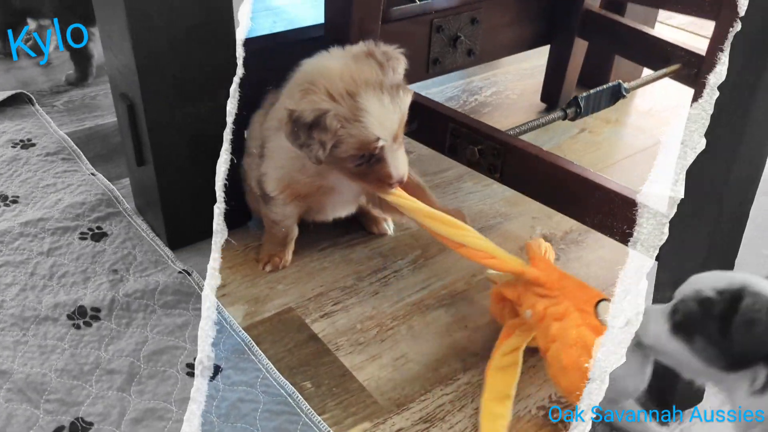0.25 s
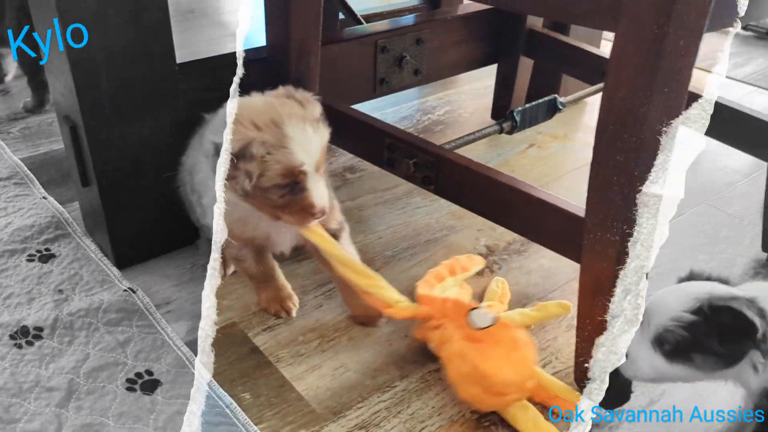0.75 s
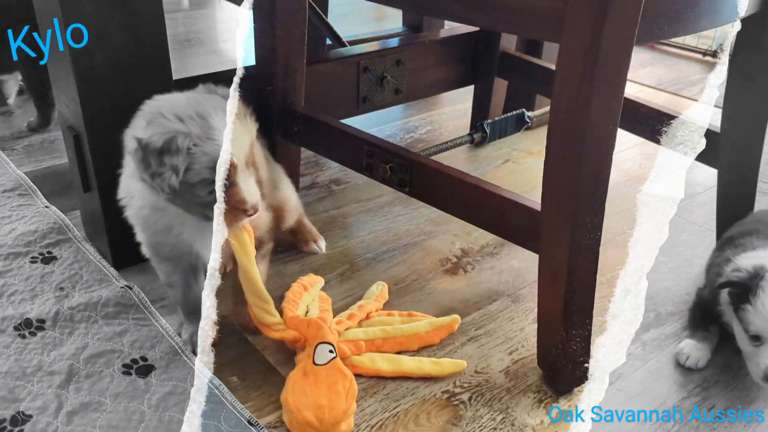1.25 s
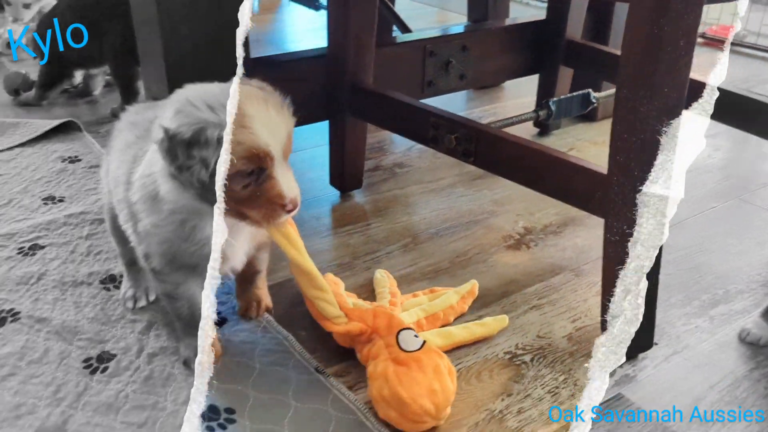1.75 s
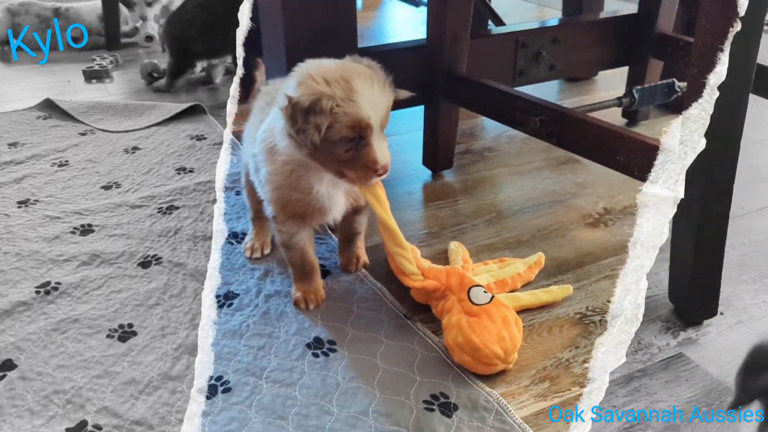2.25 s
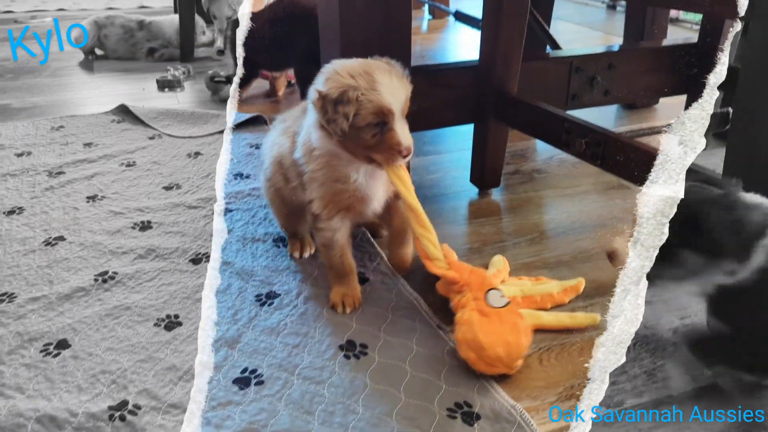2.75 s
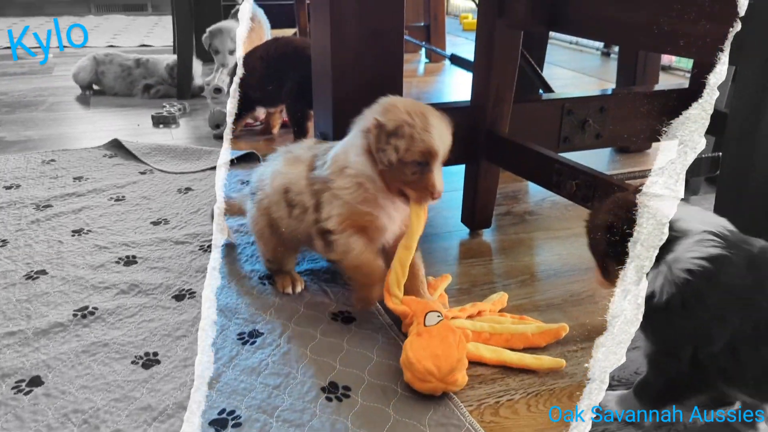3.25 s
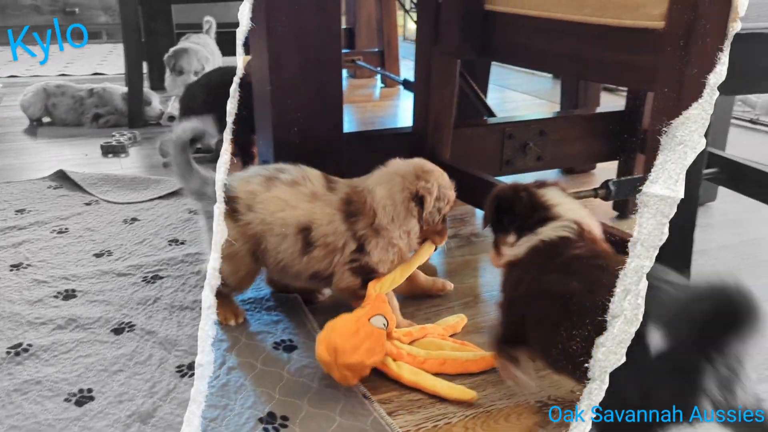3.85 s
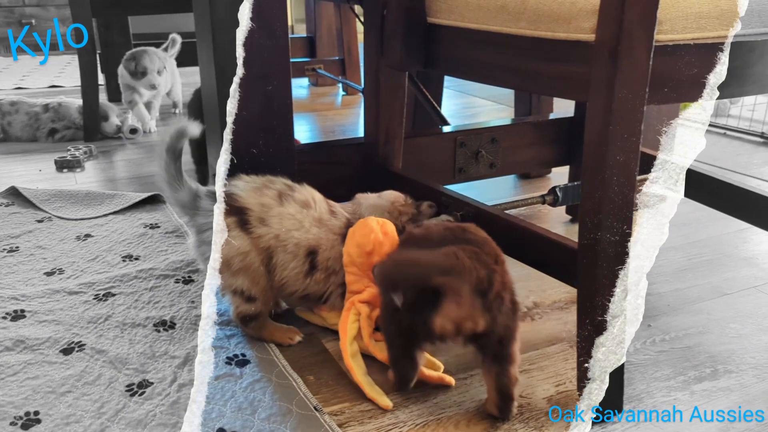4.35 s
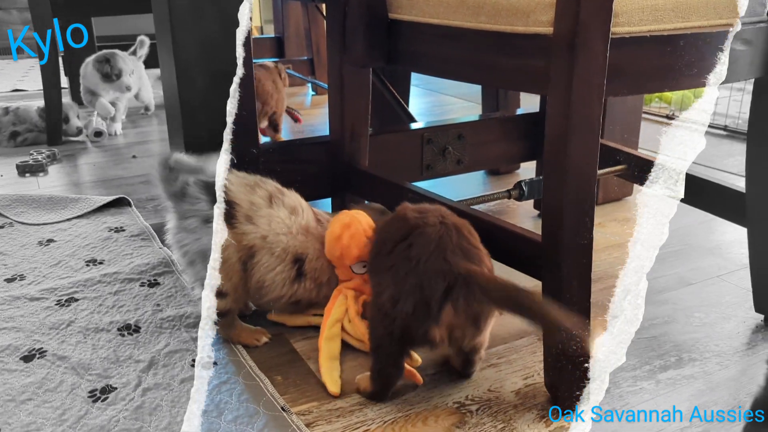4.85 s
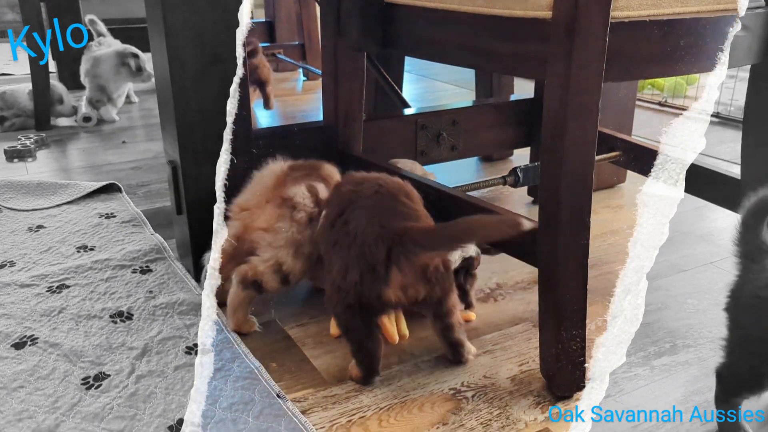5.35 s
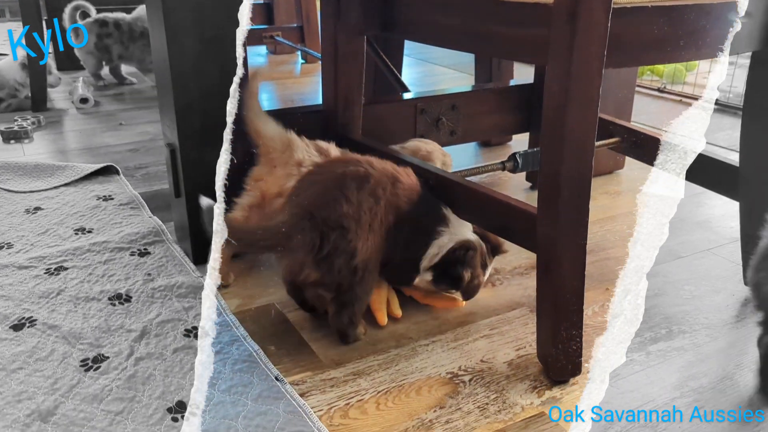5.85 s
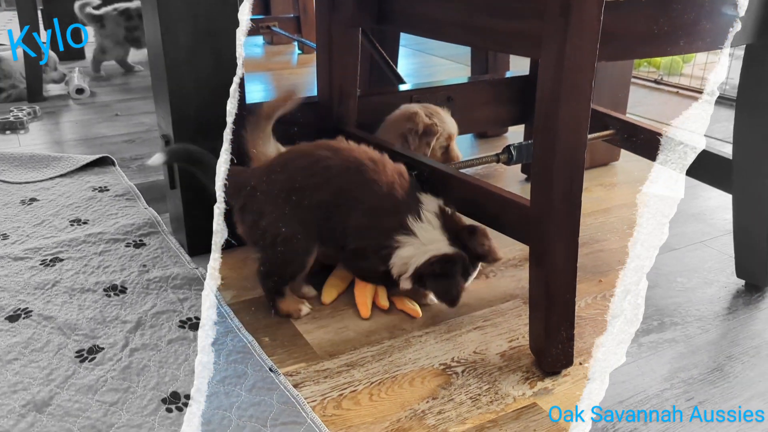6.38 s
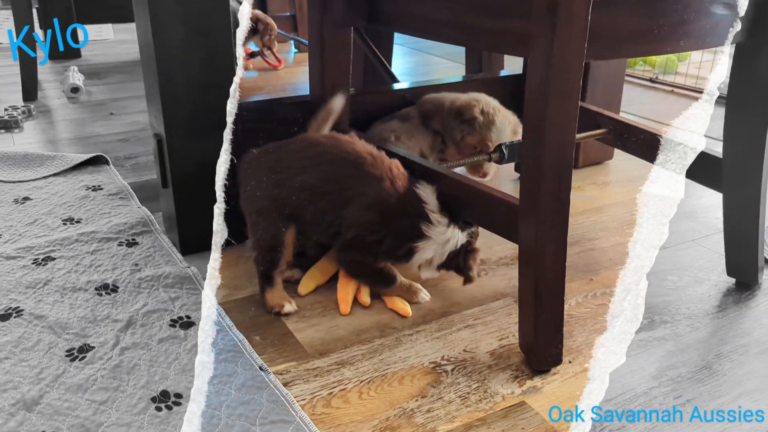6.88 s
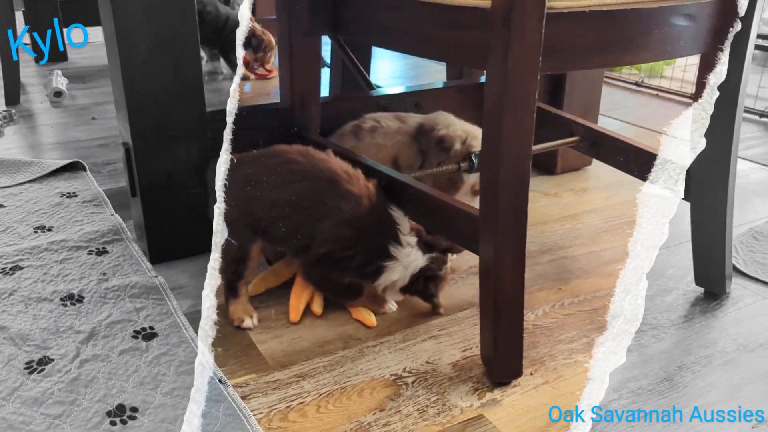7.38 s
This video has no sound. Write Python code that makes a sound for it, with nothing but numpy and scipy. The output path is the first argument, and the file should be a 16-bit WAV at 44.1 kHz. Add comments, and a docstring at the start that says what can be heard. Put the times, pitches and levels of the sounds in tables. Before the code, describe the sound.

Close indoor puppy scuffle: dull paw thuds on boards, tiny crisp claw clicks, soft fabric rubbing, and a sudden loud wooden knock that rattles briefly.

```python
"""Under a chair on a wooden floor in a live room, puppies tug a plush toy, heard close up by a phone.
Paws thump by ringing the floor boards; claws and teeth tick as short bursts of filtered noise.
Fur and plush rub in strokes of grainy noise, bodies scrape, paws slide, the chair is bumped and rings.
Once something wooden bangs down hard, rattles and settles as a run of blows with ringing modes.
The house murmurs below as steady low noise."""
import sys
import numpy as np
from scipy import signal
from scipy.fft import rfft, irfft
from scipy.io import wavfile
from scipy.ndimage import uniform_filter1d

SR = 44100
rng = np.random.default_rng(int(sys.argv[2]) if len(sys.argv) > 2 else 0)


def dump_mix(stems):
    """Bounce the given channels to the path in sys.argv[1] as a 16-bit WAV at rate SR."""
    frames = np.atleast_2d(stems).T  # one column per channel
    limited = np.clip(frames, -1, 1)  # hard clip at full scale
    pcm = np.round(limited * 32767).astype(np.int16)
    wavfile.write(sys.argv[1], SR, pcm)


N = 336042
T = np.arange(N) / SR
RING = T[:SR]  # one second, the longest that a single event sounds


# floor board modes: pitch_hz [Hz], level_db [dB], t60_s [s]; the bang rings them too
BOARD_MODES = [(63.8, -23, 0.75), (91, -25.5, 0.21), (114.3, -3, 0.22), (126.6, 6.5, 0.16),
               (163.7, 3.5, 0.23), (197, -13.5, 0.18), (296, -4.5, 0.074), (420, -39.5, .08)]
# paws landing: start_s [s], level_db [dB before gain], boom_hz [Hz], slap_db [dB against the landing]
PAW_LANDINGS = [(0.025, -31, 122.5, -34), (0.413, -33, 124, -9), (0.511, -31, 158, -12),
                (0.583, -27, 132.6, -10), (0.713, -28.5, 167.5, -7), (1.006, -26.5, 117.6, -30),
                (1.18, -37.5, 129, -5.5), (1.952, -30.5, 133.6, -11), (2.026, -33, 131, -4),
                (2.124, -34.5, 126.5, -17), (2.213, -31, 121, -17.5), (2.798, -35.5, 112.5, -10),
                (3.078, -39, 90, -9), (3.905, -34.5, 130.7, -16), (4.097, -25.5, 70, -18),
                (4.12, -21.5, 122.5, -15), (4.171, -26.5, 124, -13), (4.276, -35.5, 103, -14),
                (4.34, -33, 68, -18), (4.365, -28.5, 111.5, -14), (4.432, -28, 112, -10),
                (4.647, -35.5, 104, -14), (4.691, -30.5, 116.5, -23), (4.766, -28, 116, -15),
                (5.009, -33.5, 116.7, -17), (5.197, -33, 112, -11.5), (5.27, -22.5, 114.6, -38),
                (5.506, -38.5, 110, -20), (5.591, -36, 142, -10), (5.727, -28, 111, -10),
                (6.439, -32.5, 95.7, -19), (6.822, -32, 127, -9), (6.924, -21, 117.3, -33),
                (6.96, -33.5, 69, -24), (7.494, -31.5, 70, -20)]


def paws(contact_s=0.0047, board_hz=118, pad_t60=0.081, pad_db=-2, gain_db=-3, roll_s=0.00839, roll_db=-1):
    """Soft pads push the boards, whose pitch depends on the spot, and slap them more or less hard."""
    out = np.zeros((2, N))
    for start_s, level_db, boom_hz, slap_db in PAW_LANDINGS:
        stretch = boom_hz / board_hz
        boom = undb(level_db + gain_db) * push(ring(BOARD_MODES, stretch), contact_s)
        slap = peak(band(diffuse(size=SR) * fade(pad_t60), 318, 2.33, order=2))
        add(out, start_s, boom + undb(level_db + slap_db + pad_db) * slap)
        # the weight rolls on after the toes
        add(out, start_s + roll_s / stretch, undb(roll_db) * boom)
    return room(out, wet_db=-9)


# claws and teeth: start_s [s], level_db [dB before gain], bright_hz [Hz, centre of the snap],
# body_db [dB against the snap, before its own gain]
CLAW_TICKS = [(0.106, -38, 6940, -1), (0.177, -33, 7300, -30), (0.2479, -29.5, 12000, -11),
              (0.824, -38.5, 8270, 1), (1.068, -34, 10800, -1), (1.183, -43, 5000, -15),
              (1.23, -37.5, 7900, -2), (2.0236, -37.5, 8200, 1.5), (2.6402, -45.5, 5440, -13),
              (2.72, -39.5, 10600, -19), (2.7857, -33, 9250, -28), (3.2026, -27, 4330, -6),
              (3.261, -37, 3600, -26), (3.3298, -24.5, 9800, -28), (3.5308, -36, 7800, -6),
              (3.6, -35.5, 5100, -30), (3.676, -35.5, 3300, -5), (3.7389, -29, 3240, -27),
              (3.762, -33.5, 8300, 0.5), (3.982, -39.5, 6660, -6), (4.094, -43, 3700, -4),
              (4.2112, -24, 7440, -28), (4.221, -39, 6230, -9), (4.24, -31, 11300, -22),
              (4.683, -45, 7600, -10), (4.9454, -45, 6500, -21), (5.0291, -24.5, 5370, -6),
              (5.055, -28, 11700, -13), (5.0793, -34, 8800, -8), (5.2067, -38, 6950, -18),
              (5.572, -33, 10800, -17), (6.3663, -46.5, 2800, 7), (6.3894, -43, 11500, -3),
              (6.4606, -34, 6160, -24), (6.76, -30.5, 11700, -20)]


def ticks(gain_db=2, faint_db=-44.0, scatter_db=3, count=70):
    """Claws and teeth tick clearly, among many faint ticks from the rest of the litter."""
    out = np.zeros((2, N))
    for start_s, level_db, bright_hz, body_db in CLAW_TICKS:
        add(out, start_s + 0.0012, undb(level_db + gain_db) * tick(bright_hz, body_db))
    for when, pitch, size in rng.random((count, 3)):
        level = undb(faint_db + scatter_db * (2 * size - 2.0))
        add(out, when * T[-1], level * tick(5000 * 2 ** pitch, 1.1))
    return room(out, wet_db=-7.5)


def tick(bright_hz, low_db, snap_t60=0.016, skid_t60=0.1, skid_db=-17, grit_db=4, body_db=-5, ring_db=-4,
         pan_db=2):
    """A hard point snaps and rings briefly, then skids on with a gritty, uneven force."""
    t = RING[:SR // 8]
    grit = undb(grit_db * rng.standard_normal(len(t)))
    envelope = fade(snap_t60, t) + grit * undb(skid_db) * fade(skid_t60, t)
    force = rng.standard_normal((2, len(t))) * envelope
    snap = peak(band(band(force, bright_hz, 3.0), 7020, 1.77, order=3))
    short_ring = peak(band(force, bright_hz, 1.148, order=2))
    bright = peak(snap + undb(ring_db) * short_ring)
    body = peak(band(force, 2720, 1.42, order=2))
    sides = undb(pan_db * rng.standard_normal() * np.array([[.5], [-.5]]))
    return sides * (bright + undb(low_db + body_db) * body)


# strokes of fur and plush: start_s [s], rise_s [s], fall_s [s], hiss_db [dB before gain],
# coarse_db [dB before gain]
RUB_STROKES = [(0.0, 0.031, 0.033, -53, -63), (.1, 0.34, 1.2, -57.5, -65), (.47, 0.046, 0.19, -53, -57),
               (.55, 0.038, 0.011, -46, -55.5), (0.816, 0.022, 0.045, -49, -49),
               (1.0, 0.038, 0.66, -59.5, -57), (1.29, 0.026, 0.087, -50, -46),
               (1.75, 0.017, 0.87, -66, -63.5), (2.19, .12, 0.085, -52, -61),
               (2.776, 0.018, 0.054, -46, -63), (2.8, .15, 0.082, -53, -55.5),
               (3.198, 0.043, 0.076, -46.5, -53), (3.32, 0.096, 0.041, -53.5, -59.5),
               (3.595, 0.007, 0.26, -52, -55.5), (3.735, 0.0057, 0.068, -46, -53),
               (3.869, .08, 0.017, -50.5, -72), (4.09, 0.0099, 0.15, -53, -54),
               (4.21, .015, 0.066, -51.5, -49.5), (4.27, 0.066, 0.056, -47, -56),
               (4.33, 0.018, 0.39, -59.5, -61), (5.028, 0.008, 0.14, -53.5, -55),
               (5.12, 0.096, .16, -53.5, -57.5), (5.459, 0.076, 0.073, -45.5, -63.5),
               (5.59, .11, .085, -50.5, -62), (5.93, .02, 0.047, -55.5, -63.5),
               (5.99, .04, 0.055, -53.5, -61), (6.1, 0.17, 0.32, -62, -60.5),
               (6.46, 0.037, 0.032, -49, -69), (6.62, 0.084, 0.35, -51.5, -57.5),
               (7.01, 0.016, 0.078, -50, -59.5), (7.05, 0.054, 0.14, -50, -56.5),
               (7.2, 0.099, .19, -54.5, -53)]
# spectrum of the fine fibre hiss: pitch_hz [Hz], level_db [dB per Hz]
FUR_SPECTRUM = [(1500, -24), (2600, -6), (4200, -2.5), (5300, 1), (7000, 2), (8400, 2.5), (9800, -6.5),
                (12500, -1), (14500, -13), (16000, -7.5)]
# spectrum of the coarse plush rub: pitch_hz [Hz], level_db [dB per Hz]
COARSE_SPECTRUM = [(700, -27), (1300, 5.5), (2300, 12), (3300, 4.5), (5000, 2.5), (9000, -53.5)]
# the brush of fur that goes with every clear tick; its level is set against the tick
BRUSH_DB, BRUSH_RISE_S, BRUSH_FALL_S = -21.5, 0.0046, 0.021


def rubbing(fibre_db=2.0, stroke_db=2.24, hiss_gain_db=-1, coarse_gain_db=-2, wander_db=1.94,
            brisk=0.34, calm_db=-56, light=0.2, even_db=3,
            rest_hiss_db=-76, rest_coarse_db=-70, fidget_db=1.0):
    """Fibres catch and let go in dense tiny grains, brighter in brisk and in light strokes."""
    # the litter fidgets faintly between strokes
    fidget = fidget_db * walk(17)
    hiss = undb(rest_hiss_db + fidget)
    coarse = undb(rest_coarse_db + fidget / 2)
    for start_s, rise_s, fall_s, hiss_db, coarse_db in RUB_STROKES:
        speed = stroke(start_s, rise_s, fall_s)
        hiss = np.hypot(hiss, undb(hiss_db) * speed)
        coarse = np.hypot(coarse, undb(coarse_db) * speed)

    brushes = np.zeros((1, N))
    brush = stroke(0, BRUSH_RISE_S, BRUSH_FALL_S)[:SR]
    for start_s, level_db, _, _ in CLAW_TICKS:
        # the fur touches just before the claw
        add(brushes, start_s - BRUSH_RISE_S, undb(level_db + BRUSH_DB) * brush)
    hiss = np.hypot(hiss, brushes[0])

    grains = unit(undb(fibre_db * walk(1500) + stroke_db * walk(60)))
    brisk_tilt = brisk * np.maximum(20 * np.log10(hiss) - calm_db, 0)
    light_tilt = light * (20 * np.log10(hiss / coarse) - even_db)
    tilt = brisk_tilt + light_tilt  # dB per octave
    fine = 0
    for hz in np.geomspace(2800, 13400, 5):
        part = band(diffuse(), hz, 1.22, order=2)
        fine = fine + part * undb(wander_db * walk(30) + tilt * np.log2(hz / 7000))
    fine = unit(colour(fine * grains, FUR_SPECTRUM)) * hiss * undb(hiss_gain_db)
    rough = unit(colour(diffuse() * grains, COARSE_SPECTRUM)) * coarse * undb(coarse_gain_db)
    return fine + rough


SLOWING = 1.6  # how a stroke ends: 1 = it peters out, 2 = it is braked


def stroke(start_s, rise_s, fall_s):
    """Speed of one sliding movement, 0 to 1: it gathers pace, then slows to rest."""
    t = T - start_s
    gather = np.sin(np.pi / 2 * np.clip(t / rise_s, 0, 1)) ** 2
    return gather * np.exp(-(np.maximum(t - rise_s, 0) / fall_s) ** SLOWING)


# scrapes and bumps of bodies and toy: start_s [s], level_db [dB before gain], centre_hz [Hz],
# rise_s [s], t60_s [s]
BODY_SCRAPES = [(0.893, -33.5, 500, 0.0012, 0.03), (1.008, -30, 230, 0.0012, 0.053),
                (1.309, -32, 1900, 0.031, 0.35), (1.901, -37, 2320, 0.0016, 0.044),
                (4.098, -40, 895, 0.0072, 0.065), (4.218, -31, 2200, 0.001, 0.075),
                (5.081, -28.5, 1350, 0.0057, 0.047), (5.095, -39.5, 1050, 0.0076, 0.53),
                (5.262, -36.5, 372, 0.0011, 0.058), (5.482, -36.5, 930, 0.0031, 0.29),
                (5.552, -36.5, 1680, .001, 0.025), (5.951, -40.5, 1590, 0.0045, 0.098),
                (6.79, -42, 1000, 0.0038, 0.14), (6.82, -42, 720, 0.012, 0.57),
                (6.822, -40, 1990, 0.016, 0.49), (7.449, -42, 2000, 0.00092, .04)]


def scrapes(gain_db=-1):
    """Brief friction that swells and dies in one broad resonance."""
    out = np.zeros((2, N))
    for start_s, level_db, centre_hz, rise_s, t60_s in BODY_SCRAPES:
        swell = np.minimum(RING / rise_s, 1) * fade(t60_s, np.maximum(RING - rise_s, 0))
        rasp = band(band(diffuse(size=SR) * swell, centre_hz, 1.25), centre_hz, 2.2)
        add(out, start_s, undb(level_db + gain_db) * peak(rasp))
    return room(out, wet_db=-4)


# paws sliding over the boards: start_s [s], rise_s [s], fall_s [s], level_db [dB before gain]
PAW_SLIDES = [(0.0, 0.031, 0.089, -47), (.25, 0.29, 0.27, -45), (.48, 0.29, .15, -38.5),
              (1.0, 0.32, 0.091, -39.5), (1.88, .1, 0.3, -44), (2.58, 0.11, 0.1, -47.5),
              (3.865, 0.0092, 0.026, -43), (4.08, 0.022, 0.096, -40), (5.15, 0.14, .07, -44),
              (5.56, 0.037, .22, -42.5), (6.3, 0.1, 0.13, -50), (6.85, 0.087, .06, -43)]
# spectrum of the boards under a sliding paw: pitch_hz [Hz], level_db [dB per Hz]
DRAG_SPECTRUM = [(29, -55), (50, -14.5), (112, -1), (162, -2), (210, -11), (277, -10.5), (304, -15),
                 (339, -14), (2000, -47), (2600, -78), (4400, -120)]


def shuffling(judder_db=1.0, gain_db=-2, rest_db=-58, fidget_db=2):
    """Paws slide and judder, drumming lightly on the boards; the other puppies pad about faintly."""
    level = undb(rest_db + fidget_db * walk(8))
    for start_s, rise_s, fall_s, level_db in PAW_SLIDES:
        level = np.hypot(level, undb(level_db) * stroke(start_s, rise_s, fall_s))
    juddering = diffuse() * undb(judder_db * walk(90))
    return unit(colour(juddering, DRAG_SPECTRUM)) * level * undb(gain_db)


# light knocks against the chair: start_s [s], level_db [dB]
CHAIR_KNOCKS = [(4.099, -35), (4.165, -32)]
# what the chair rings with: pitch_hz [Hz], level_db [dB], t60_s [s]
CHAIR_MODES = [(833, 4, 0.072), (910, -6, 0.093), (1112, -2, 0.063), (2060, -2, .035)]


def knocks(contact_s=0.00032, tap_t60=0.014, tap_db=0):
    """A puppy bumps the chair: a dull tap and a short wooden ring."""
    out = np.zeros((2, N))
    for start_s, level_db in CHAIR_KNOCKS:
        tap = peak(band(diffuse(size=SR) * fade(tap_t60), 890, 1.23))
        wood = push(ring(CHAIR_MODES), contact_s)
        add(out, start_s, undb(level_db) * (wood + undb(tap_db) * tap))
    return room(out, wet_db=-5)


# blows of the bang: start_s [s], boom_db [dB], wood_db [dB], crack_db [dB]
BANG_BLOWS = [(1.3737, -9, -14.5, -3), (1.387, -25, -30, -21.5), (1.419, -28, -21, -26),
              (1.4258, -17, -20.5, -21), (1.442, -33, -23.5, -20.5), (1.546, -17.5, -38, -27.5),
              (1.617, -31, -52, -57), (1.664, -28.5, -33.5, -27.5)]
# what the struck wood rings with: pitch_hz [Hz], level_db [dB before the scatter], t60_s [s]
WOOD_MODES = [(249.6, -5, 0.41), (280.9, 2, 0.39), (347, -5, .25), (410, -5, 0.43), (424, -3.5, 0.53),
              (507, -4.5, 0.36), (563, -2.5, 0.41), (655, -1, 0.21), (780, -9.5, 0.27), (830, -11, 0.352),
              (1680, -42, .6), (1990, -20, 0.29), (3900, -18, 0.55), (3970, -15, 0.28), (5710, -25, 0.27)]
# spectrum of the crack, bright in two broad bands: pitch_hz [Hz], level_db [dB per Hz]
CRACK_SPECTRUM = [(120, -42), (220, 2), (480, 5), (680, 1), (1000, -9), (1500, -13), (2000, -11.5),
                  (2950, -20.5), (3700, -13.5), (4250, -7.5), (5300, -20), (6300, -11), (8200, -16.5),
                  (9500, -22), (13600, -25.5), (16000, -66)]


def bang(crack_t60=0.038, contact_s=0.0044, spot_db=-3.5, tail_db=0):
    """Wood hits the floor and rebounds: each blow cracks, rings the wood and booms the boards."""
    out, booms = np.zeros((2, N)), np.zeros((2, N))
    boom = push(ring(BOARD_MODES), contact_s)
    for start_s, boom_db, wood_db, crack_db in BANG_BLOWS:
        # every blow lands on another spot, which weights the modes anew and has its own echo
        signs = rng.choice([-1, 1], len(WOOD_MODES))
        weights = signs * undb(spot_db * rng.standard_normal(len(WOOD_MODES)))
        wood = peak(sum(weight * ring([mode]) for weight, mode in zip(weights, WOOD_MODES)))
        direct = unit(diffuse(size=SR) * fade(crack_t60)) / np.sqrt(SR)
        crack = peak(colour(direct + undb(tail_db) * echo(), CRACK_SPECTRUM))
        add(out, start_s, undb(wood_db) * wood + undb(crack_db) * crack)
        add(booms, start_s, undb(boom_db) * boom)
    return out + room(booms, wet_db=-5.0)


# spectrum of the house murmur: pitch_hz [Hz], level_db [dB per Hz]
AIR_SPECTRUM = [(25, -22.5), (55, 8), (80, -5.5), (120, 3.5), (200, -14), (300, -19), (430, -10.5),
                (800, -18), (1260, -25), (2000, -27), (4000, -39.5), (7000, -38.5), (12000, -65),
                (16000, -51)]
AIR_DB = -50.5


def air(swell_db=1):
    """The low murmur of the house: shaped noise that swells slightly."""
    return unit(colour(diffuse(), AIR_SPECTRUM)) * undb(AIR_DB + swell_db * walk(2.737))


# how long the room rings: pitch_hz [Hz], t60_s [s]
ROOM_DECAY = [(100, 0.63), (500, 0.55), (2000, 0.66), (5000, 0.43), (14000, 0.39)]


def echo(build_s=0.0033):
    """The room's diffuse answer to a click, of unit energy: it builds up fast, then each band decays."""
    spectrum, hz = rfft(diffuse(size=SR)), np.fft.rfftfreq(SR, 1 / SR)
    centres, t60s = np.transpose(ROOM_DECAY)
    # overlapping bands that add up to the whole spectrum
    shares = [at_hz(np.c_[centres, one], hz) for one in np.eye(len(centres))]
    tail = sum(irfft(spectrum * share, SR) * fade(t60) for share, t60 in zip(shares, t60s))
    return unit(tail * (1 - np.exp(-(RING / build_s) ** 2))) / np.sqrt(SR)


def room(x, wet_db):
    """The sound with its echo."""
    return x + undb(wet_db) * signal.fftconvolve(x.mean(axis=0)[None], echo(), axes=1)[:, :N]


# how unlike the phone's two ears hear diffuse sound: pitch_hz [Hz], side_db [dB]
STEREO_SPREAD = [(60, -23.5), (160, -15.5), (350, -8.5), (800, -0.5), (1500, 1), (15000, 0.5)]


def diffuse(size=N):
    """Stereo noise, alike in the bass and unrelated in the treble."""
    mid, side = rng.standard_normal((2, size))
    side = colour(side, STEREO_SPREAD)
    return np.array([mid + side, mid - side])


def undb(db):
    """Decibels to gain."""
    return 10 ** (np.asarray(db) / 20)


def unit(x):
    """Scale to rms 1."""
    return x / np.sqrt(np.mean(x ** 2))


def peak(x):
    """Scale to peak 1."""
    return x / np.abs(x).max()


def at_hz(points, hz):
    """Read (Hz, value) points on a log-frequency axis."""
    f, value = np.transpose(points)
    return np.interp(np.log(np.maximum(hz, 1)), np.log(f), value)


def colour(x, points, size=4096):
    """Causal minimum-phase filter with the given (Hz, dB) spectrum."""
    gain = undb(at_hz(points, np.fft.rfftfreq(size, 1 / SR)))
    # folding the cepstrum forward makes the response start at once
    cepstrum = irfft(np.log(gain))
    cepstrum[1:size // 2] *= 2
    cepstrum[size // 2 + 1:] = 0
    response = irfft(np.exp(rfft(cepstrum)))
    response = response.reshape((1,) * (x.ndim - 1) + (-1,))
    return signal.oaconvolve(x, response, axes=-1)[..., :x.shape[-1]]


def band(x, hz, ratio, order=1):
    """Band-pass from hz / ratio to hz * ratio, kept below the top of the spectrum."""
    edges = [hz / ratio, min(hz * ratio, .47 * SR)]
    return signal.sosfilt(signal.butter(order, edges, "band", fs=SR, output="sos"), x)


def fade(t60, t=RING):
    """Exponential decay of 60 dB in t60 seconds."""
    return np.exp(-np.log(1000) * t / t60)


def walk(rate):
    """Smooth random wander of rms 1, with about rate new values a second."""
    size = max(int(SR / rate), 1)
    steps = np.repeat(rng.standard_normal(N // size + 1), size)
    return unit(uniform_filter1d(steps, size)[:N])


def ring(modes, stretch=1):
    """Decaying modes, all set off by one push."""
    return sum(undb(level_db) * np.sin(2 * np.pi * hz * stretch * RING) * fade(t60)
               for hz, level_db, t60 in modes)


def push(x, contact_s):
    """Soften a blow: the force rises and falls over the contact time."""
    force = np.sin(np.pi * np.clip((RING + 1 / SR) / contact_s, 0, 1)) ** 2
    return peak(signal.fftconvolve(x, force)[:len(x)])


def add(out, start_s, x):
    """Mix x into out from start_s on."""
    start = max(int(start_s * SR), 0)
    out[:, start:start + x.shape[-1]] += x[..., :N - start]


def scene():
    """All sources together."""
    puppies = paws() + ticks() + rubbing() + scrapes() + shuffling()
    return puppies + knocks() + bang() + air()


def record(dry):
    """The phone drops the deepest bass below 48 Hz and cuts the top above 15.9 kHz."""
    thin = signal.sosfilt(signal.butter(5, 48, "high", fs=SR, output="sos"), dry)
    return signal.sosfilt(signal.ellip(10, .2, 80, 15900, fs=SR, output="sos"), thin)


dry = scene()
out = record(dry)
dump_mix(out)
```